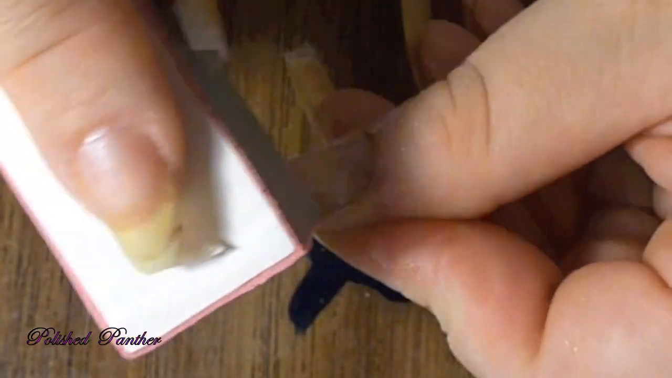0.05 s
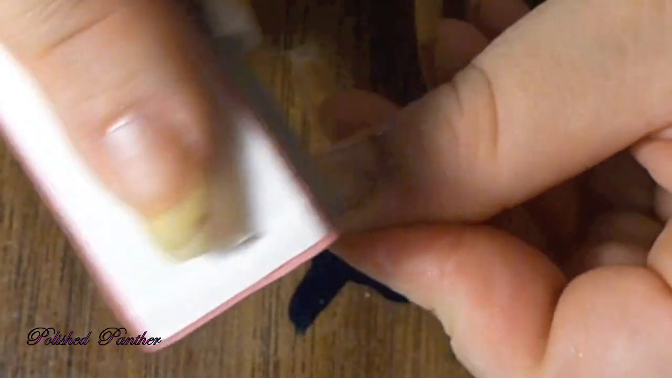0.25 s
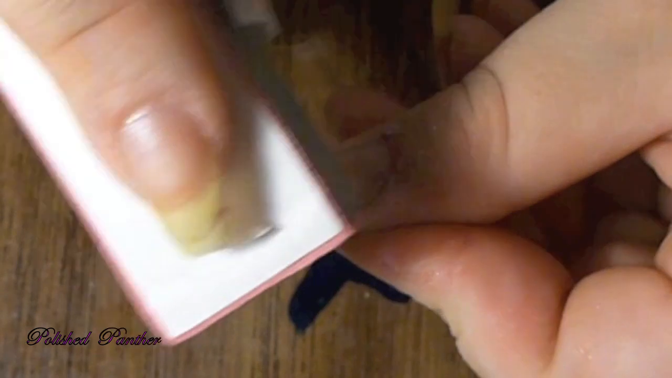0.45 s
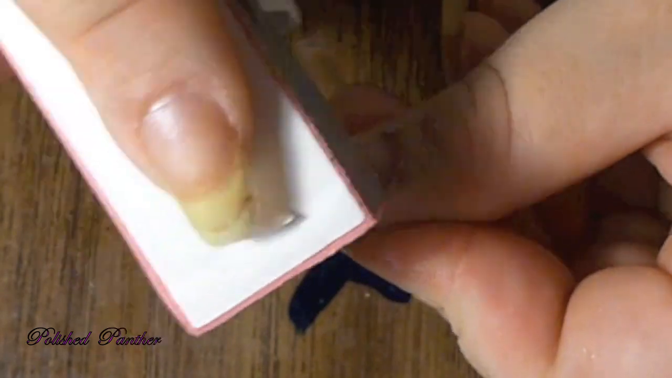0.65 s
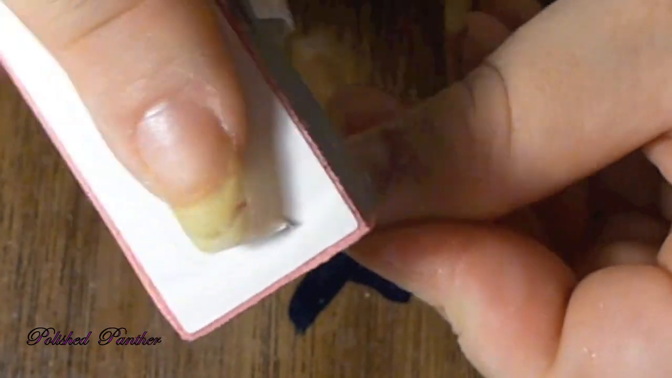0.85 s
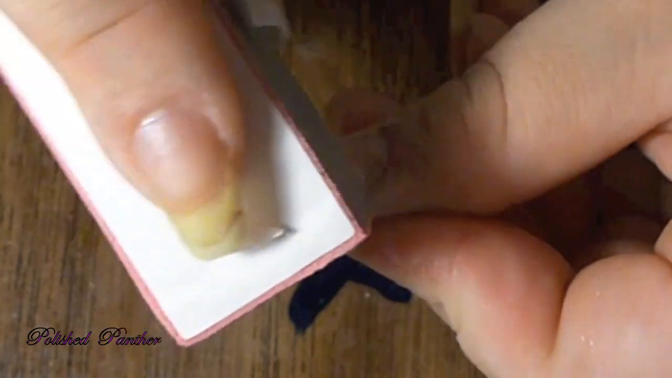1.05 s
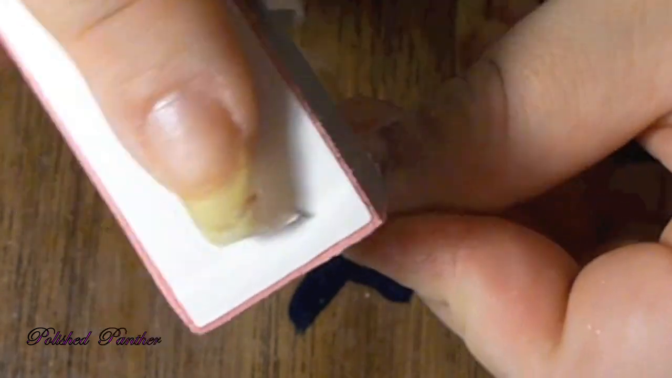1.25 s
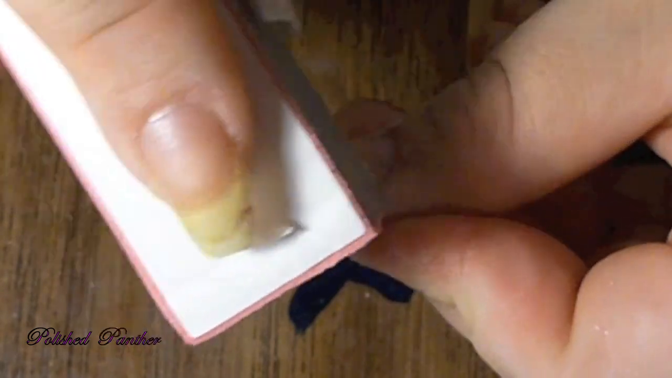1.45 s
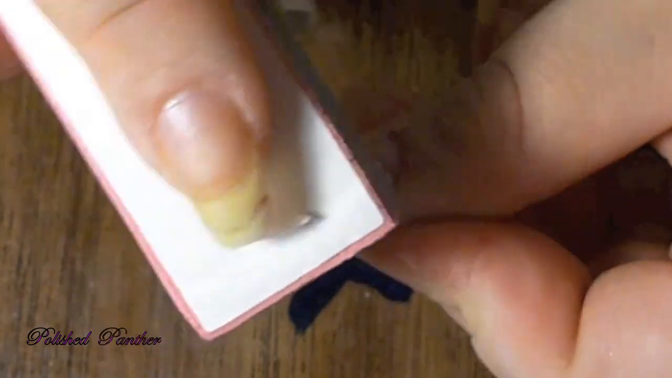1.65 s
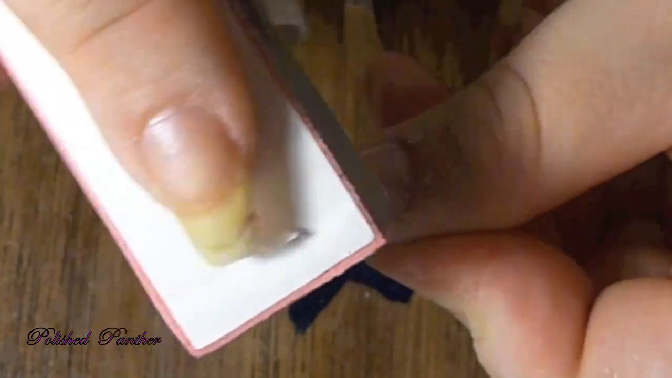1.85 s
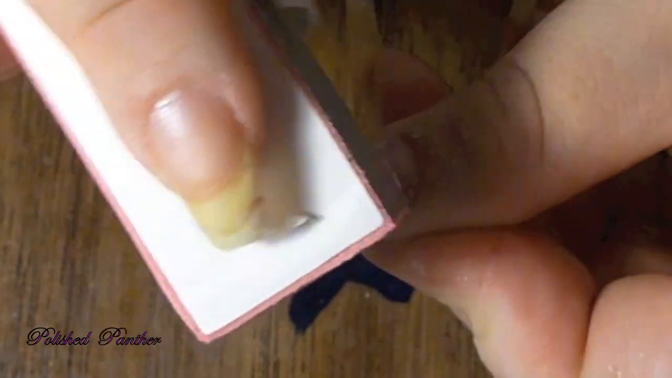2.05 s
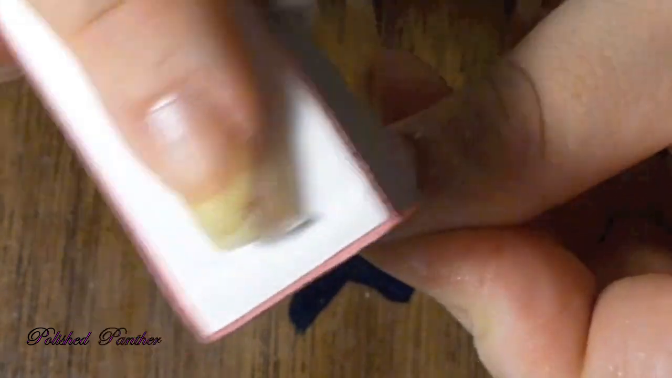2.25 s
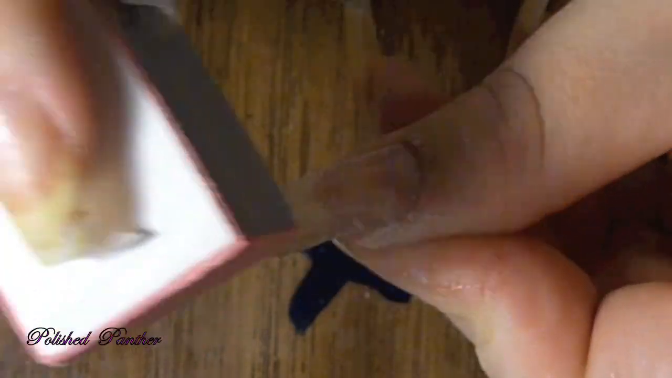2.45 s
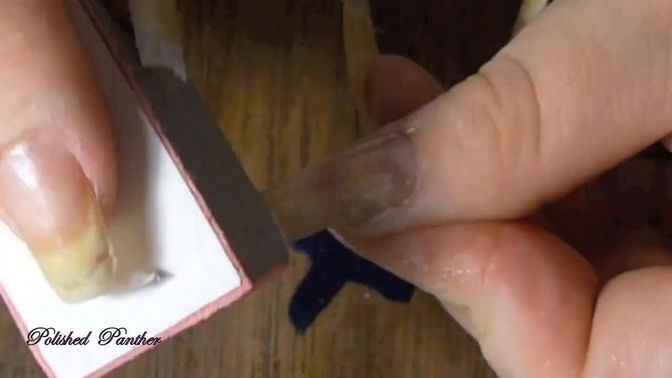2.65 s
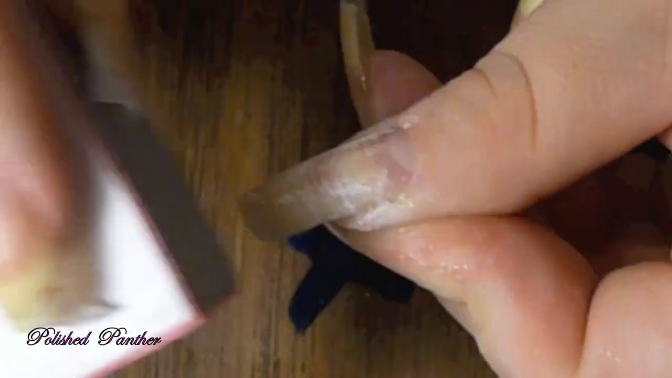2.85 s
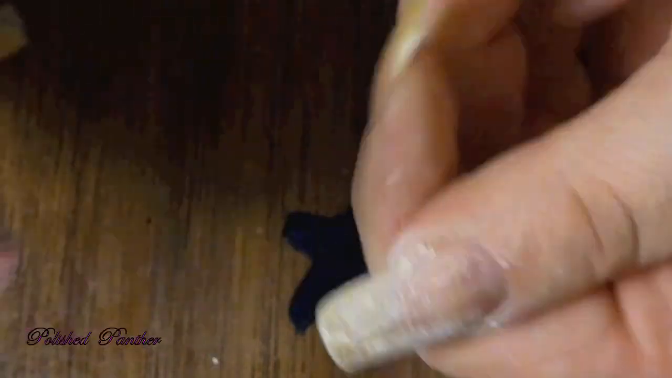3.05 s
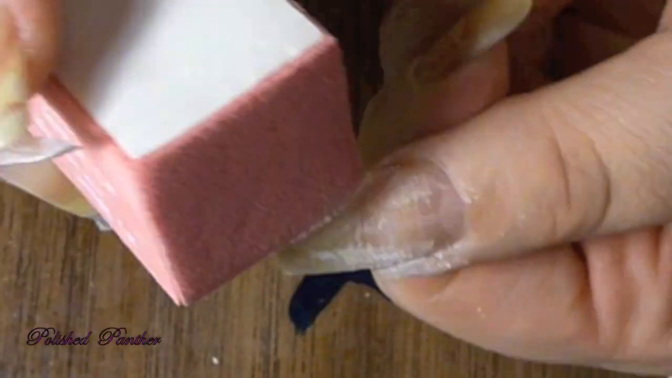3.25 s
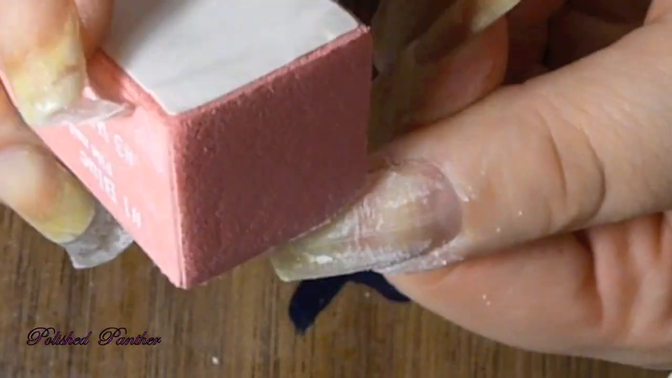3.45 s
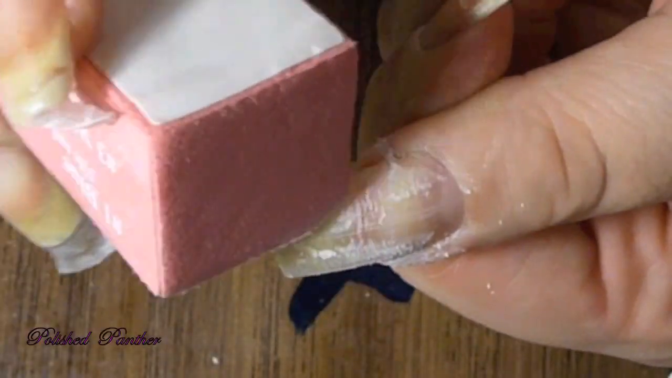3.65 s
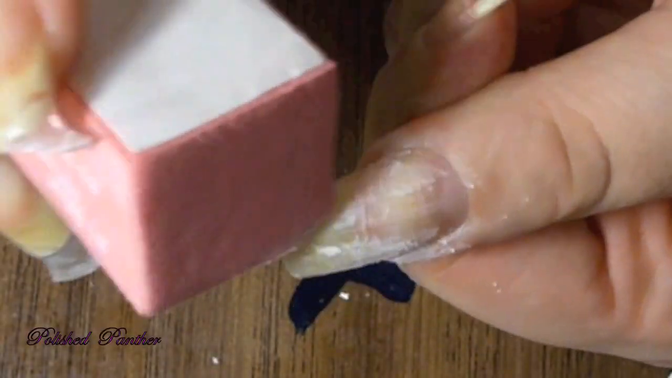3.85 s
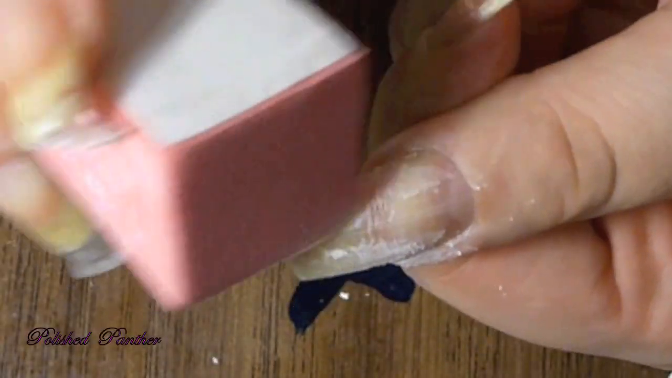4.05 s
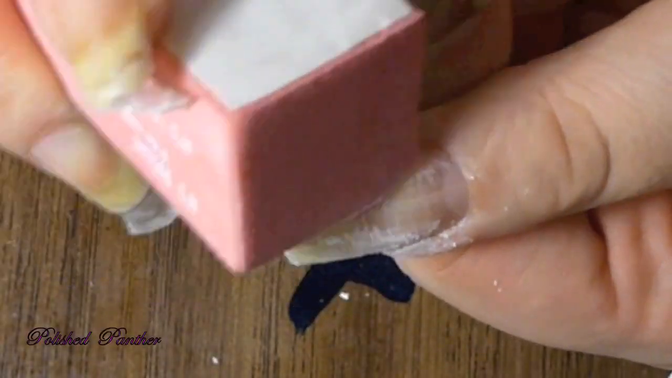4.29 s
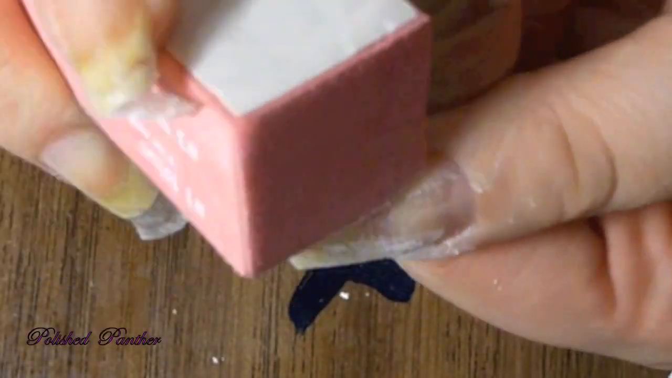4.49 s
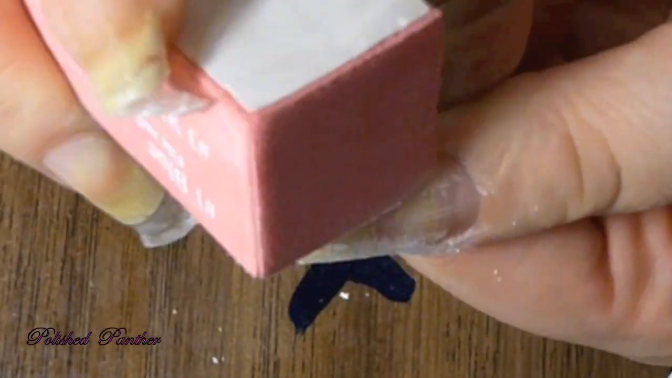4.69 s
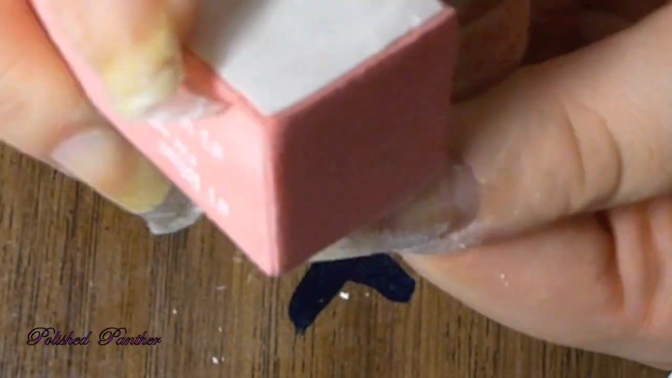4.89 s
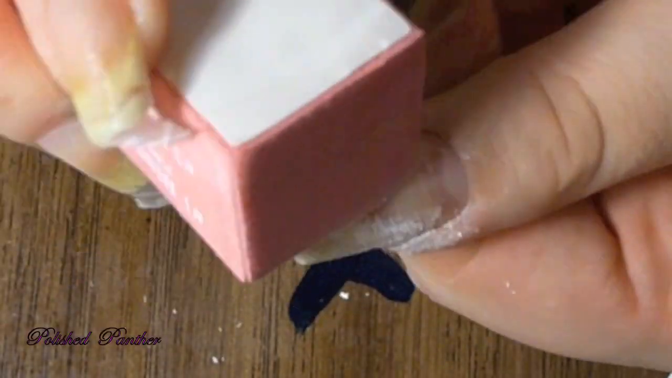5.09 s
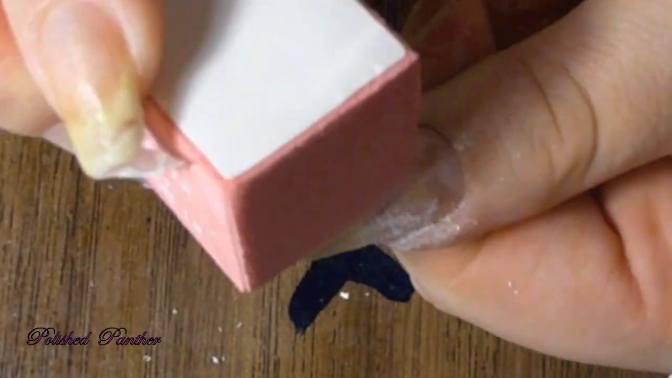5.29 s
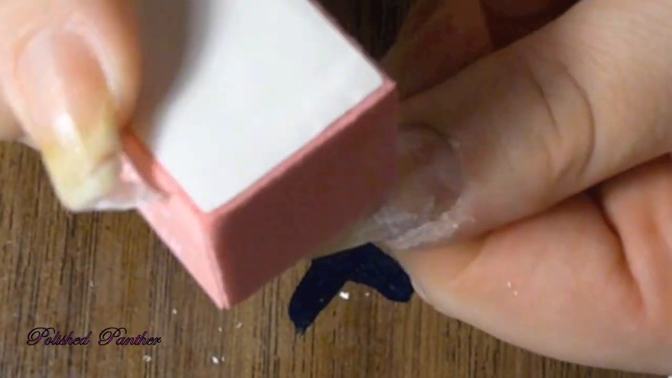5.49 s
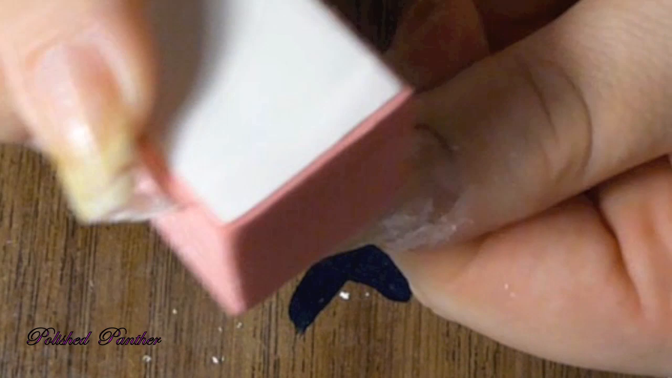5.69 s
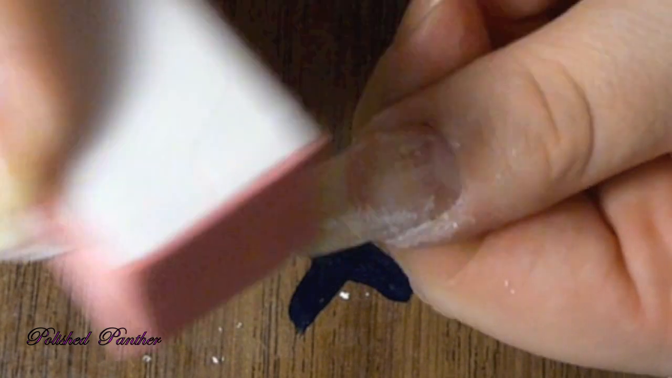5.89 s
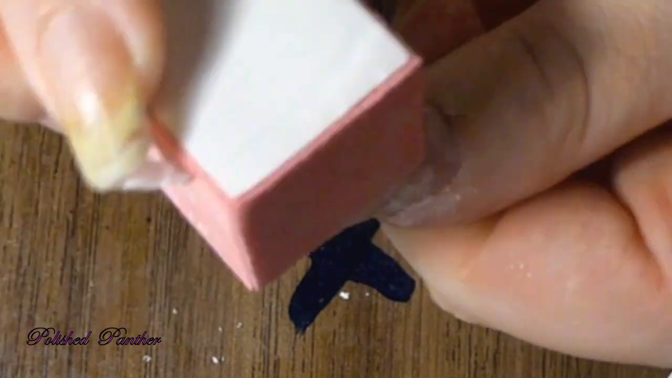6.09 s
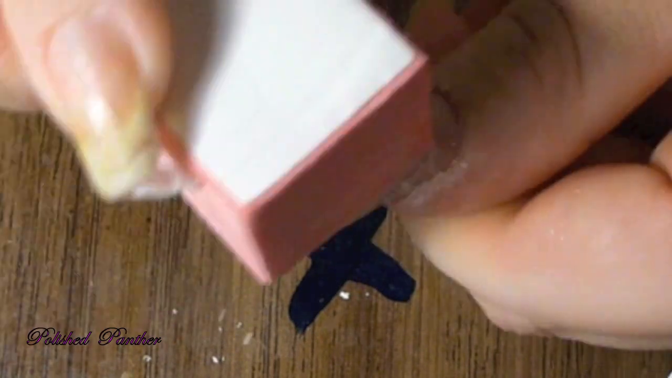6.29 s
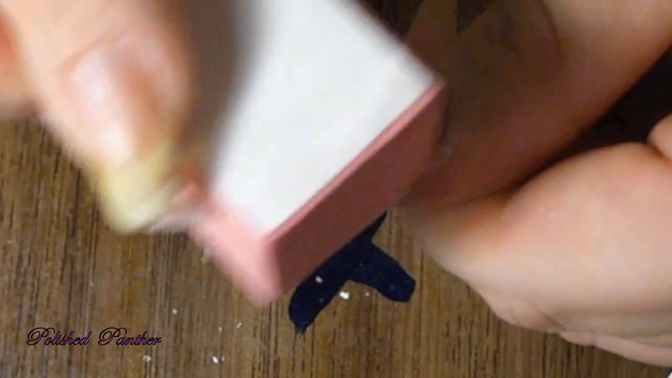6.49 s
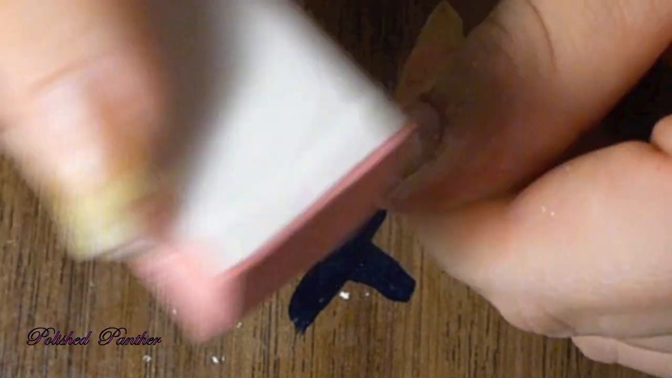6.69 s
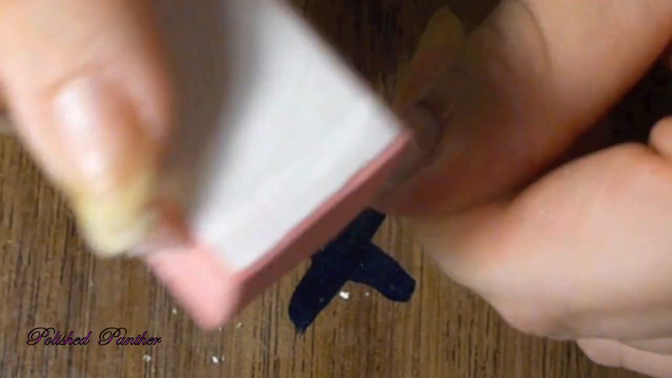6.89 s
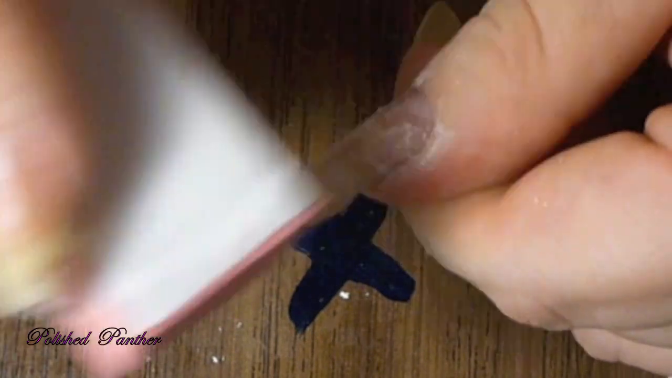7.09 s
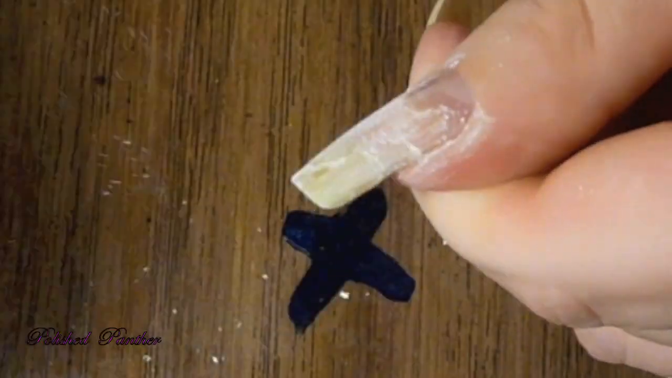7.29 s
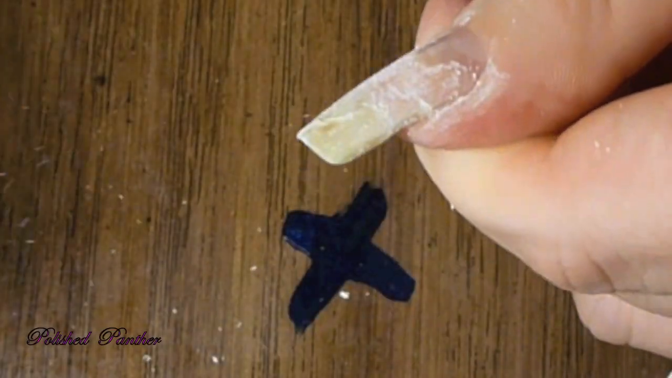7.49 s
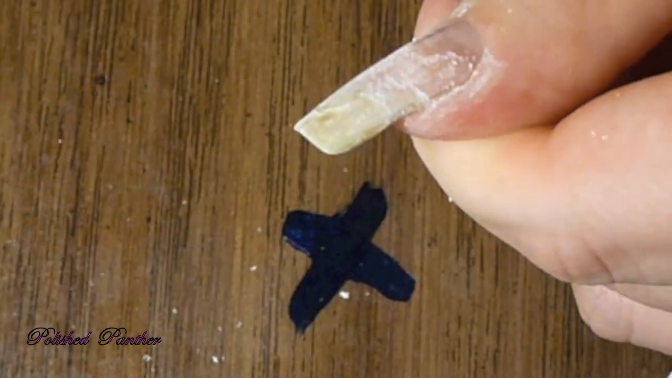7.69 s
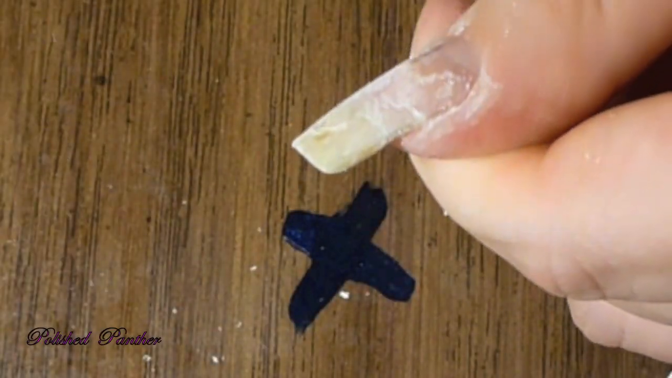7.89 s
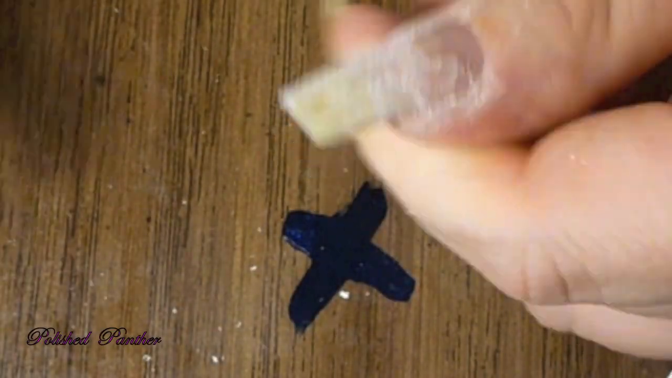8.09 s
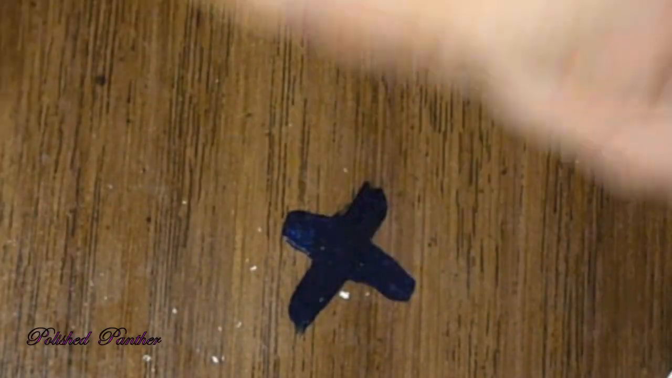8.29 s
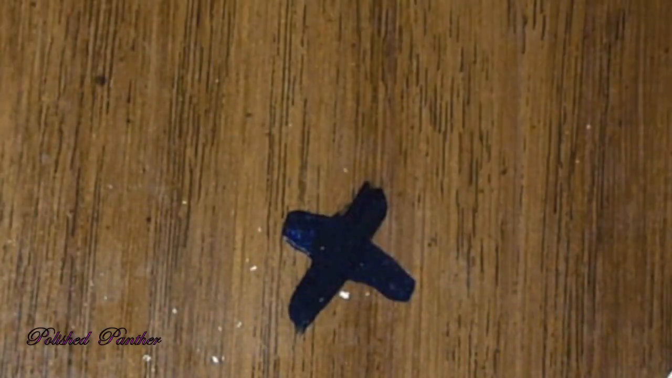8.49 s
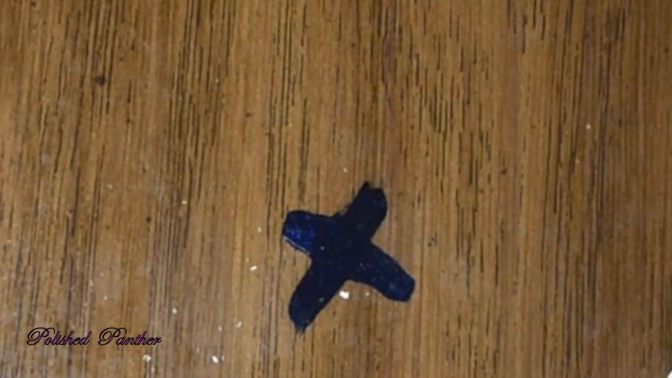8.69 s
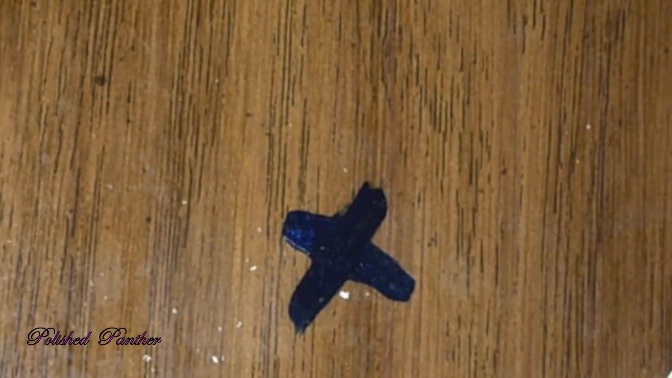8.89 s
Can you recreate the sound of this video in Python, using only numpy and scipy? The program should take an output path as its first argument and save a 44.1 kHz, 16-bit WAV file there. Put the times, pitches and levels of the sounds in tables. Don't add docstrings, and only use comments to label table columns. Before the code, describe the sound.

A foam buffer block scrapes rapidly back and forth over a fingernail, slows to tapping swipes, then drops and rattles on a wooden table.

```python
import sys
import numpy as np
from scipy import signal
from scipy.fft import rfft, irfft
from scipy.io import wavfile

SR = 44100
rng = np.random.default_rng(int(sys.argv[2]) if len(sys.argv) > 2 else 0)


def int16_out(signal):
    q = np.round(np.clip(np.atleast_2d(signal).T, -1, 1) * 32767)
    wavfile.write(sys.argv[1], SR, q.astype(np.int16))


def how_loud(loudness_db):
    steps = np.asarray(loudness_db, float) / 20
    return 10 ** steps


N = 394254

# pitch_hz, width_hz, level_db
GRIP_MODES = [
    [(700, 250, -17.5), (1261, 93, -13), (1674, 79, -12), (1886, 83, -4.5), (2190, 293, -0.5),
     (2686, 92, 4), (2913, 120, 0), (3330, 274, 2.5), (4134, 307, -6.5), (4570, 350, -6.5), (5454, 154, -5),
     (5990, 840, -17.5)],
    [(557, 230, -15.5), (747, 144, -12.5), (1048, 110, -17.5), (1410, 110, -17.5), (1523, 76, -16),
     (2110, 150, -16), (2400, 150, -14.5), (2900, 453, -8), (3344, 313, -5.5), (4120, 340, -16.5),
     (4640, 190, -17.5), (5380, 520, -22)],
    [(634, 72, -15.5), (1160, 230, -20), (1605, 420, -16.5), (2120, 250, -5.5), (2500, 220, -6),
     (2930, 395, -2), (3356, 283, 1.5), (4230, 690, 7.5), (4820, 710, 7), (5255, 700, 5),
     (6000, 510, -41.5)],
]
ROOM_T60_S = 0.56


def rms_one(x):
    return x / np.sqrt(np.mean(x ** 2) + 1e-20)


def along(rows):
    t = np.arange(N) / SR
    swells = [db + np.minimum(rise * (t - s), fall * (s - t)) for s, db, rise, fall in rows]
    return how_loud(np.max(swells, axis=0))


def drift(rate_hz):
    r = np.exp(-2 * np.pi * rate_hz / SR)
    noise = rng.standard_normal(N + SR)
    return rms_one(signal.lfilter([1], [1, -2 * r, r * r], noise)[SR:])


def resonate(x, modes):
    pulse = np.zeros(SR // 4)
    pulse[0] = 1
    out, response = 0, 0
    for k, (hz, width_hz, level_db) in enumerate(modes):
        r = np.exp(-np.pi * width_hz / SR)
        b = (-1) ** k * how_loud(level_db) * (1 - r * r) / 2 * np.array([1, 0, -1])
        a = [1, -2 * r * np.cos(2 * np.pi * hz / SR), r * r]
        out = out + signal.lfilter(b, a, x + 1e-18)
        response = response + signal.lfilter(b, a, pulse)
    return out / np.sqrt(np.sum(response ** 2))


def grit(per_s, spread_db):
    sizes = how_loud(spread_db * np.minimum(rng.exponential(1, N), 4)) * rng.choice([-1, 1], N)
    catches = rng.random(N) < per_s / SR
    return rms_one(sizes * catches)


def coloured(spectrum):
    hz = np.maximum(np.arange(N // 2 + 1) * SR / N, 1)
    points = np.array(spectrum)
    level_db = np.interp(np.log(hz), np.log(points[:, 0]), points[:, 1])
    return rms_one(irfft(rfft(rng.standard_normal(N)) * how_loud(level_db), N))


def burst(noise, length_s):
    shape = np.exp(-np.arange(len(noise)) / SR / length_s)
    return shape * noise / np.sqrt(np.sum((shape * noise) ** 2) / np.sum(shape ** 2))


def room_tone():
    # peak_s, peak_db
    rumble_peaks = [(0.94, -49.5), (2.19, -52), (2.84, -51.5), (3.66, -50), (5.38, -50.5), (6.03, -49.5),
                    (7.37, -51), (8.39, -51), (8.93, -51.5)]
    # pitch_hz, level_db (per Hz)
    rumble_colour = [(12, -47.5), (30, -20), (85, -4.5), (150, -2.5), (270, 0.5), (420, -5.5), (700, -19),
                     (2000, -52)]
    # pitch_hz, level_db (per Hz)
    hiss_colour = [(100, -17), (500, -2), (900, -2.5), (1130, -1.5), (1450, -5.5), (1900, -9.5),
                   (4730, -14.5), (7400, -29)]
    rest_db, rise_db_per_s, fall_db_per_s, air_db = -53.5, 7, 8, -52.5
    swells = along([(s, db, rise_db_per_s, fall_db_per_s) for s, db in rumble_peaks])
    rumble = np.maximum(swells, how_loud(rest_db)) * coloured(rumble_colour)
    flutter = how_loud(0.6 * drift(4))
    return rumble + how_loud(air_db) * flutter * coloured(hiss_colour)


def strokes():
    # start_s, length_s, scrape_db (at the end), swell_db (over the stroke)
    first_strokes = [(0.043, 0.054, -35.5, -3.6), (0.131, 0.052, -26, 2), (0.228, 0.048, -30, -1),
                     (0.306, 0.048, -25, 2.5), (0.406, 0.054, -35.5, -5.5), (0.497, 0.043, -24, 2.3),
                     (0.595, 0.05, -34.5, -4), (0.677, 0.05, -29.5, -1), (0.775, 0.045, -28.5, 0),
                     (0.863, 0.043, -30, 0), (0.956, 0.052, -32, -1.5), (1.041, 0.056, -31, 1.4),
                     (1.148, 0.062, -28.5, 0.9), (1.241, 0.066, -28.5, 0.1), (1.348, 0.058, -29, -0.5),
                     (1.441, 0.051, -27, 1), (1.548, 0.054, -32, -2.3), (1.629, 0.069, -27, 2.8),
                     (1.742, 0.067, -29, 2.3), (1.844, 0.058, -31, -1.5), (1.942, 0.063, -32, -1.5),
                     (2.037, 0.066, -27.5, 1.2), (2.145, 0.055, -34, -4), (2.231, 0.065, -27.5, 0.7),
                     (2.329, 0.054, -34.5, -4), (2.645, 0.064, -34, -4), (2.846, 0.063, -31, -2)]
    second_strokes = [(3.391, 0.059, -36.5, -3.5), (3.463, 0.058, -28, 2), (3.557, 0.039, -29.5, -2.5),
                      (3.652, 0.054, -26.5, -3.5), (3.73, 0.049, -22.5, 1.7), (3.832, 0.078, -28, -2.8),
                      (3.935, 0.057, -26.5, -4.5), (4.027, 0.064, -25, 0.7), (4.117, 0.053, -26.5, -0.5),
                      (4.214, 0.074, -30.5, -2.5), (4.308, 0.051, -23.5, 2), (4.403, 0.071, -31, -2.5),
                      (4.499, 0.057, -26.5, -1), (4.595, 0.06, -27.5, -1), (4.681, 0.049, -25, 2),
                      (4.783, 0.07, -25.5, 1.8), (4.878, 0.061, -32, -3), (4.975, 0.078, -28.5, -1),
                      (5.074, 0.072, -28.5, -0.8), (5.173, 0.081, -32, -5.5), (5.269, 0.072, -23.5, 1.8),
                      (5.37, 0.064, -26, 0.5), (5.472, 0.059, -28, -1.5), (5.569, 0.059, -33.5, -3),
                      (5.659, 0.061, -25.5, 1), (5.759, 0.051, -34, -4.5), (5.831, 0.058, -25.5, 1.5),
                      (5.919, 0.057, -32, -3.5)]
    one_way = [
        (6.171, 0.055, -25.5, -1),
        (6.366, 0.064, -28, -1),
        (6.556, 0.052, -30.5, -2.5),
        (6.73, 0.06, -30.5, -2),
        (6.928, 0.067, -34.5, -3),
        (7.026, 0.044, -27, 11),
        (7.107, 0.065, -31.5, -1.5),
    ]
    # body_db, more body_db on the way back, body change (dB/s),
    # nail hiss_db, hiss change (dB/s)
    grip_shares = [
        (-12.5, 2, -0.52, -5.5, 0.92),
        (-16.5, -0.3, -0.25, -12.5, 1.65),
        (-17, -1.4, 2.5, 0, -5.1),
    ]
    usual_scrape_db = -28.5
    hold = 0.33
    rows = []
    for grip, (moves, shares) in enumerate(zip([first_strokes, second_strokes, one_way], grip_shares)):
        body_db, back_db, body_slope, hiss_db, hiss_slope = shares
        for k, (s, length_s, level_db, swell_db) in enumerate(moves):
            since_s = s - moves[0][0]
            held_db = hold * (level_db - swell_db - usual_scrape_db)
            body = body_db + back_db * (k % 2) + body_slope * since_s - held_db
            hiss = hiss_db + hiss_slope * since_s - held_db
            rows.append((grip, s, length_s, level_db, swell_db, body, hiss))
    return rows


def rubbing():
    # middle_s, growth (dB/s)
    flattening = [
        (1.2, 0.34),
        (4.5, 2.5),
        (6.6, 2.5),
    ]
    rise_s, fall_s, wobble_db = 0.012, 0.031, 0.5
    body_top_hz, low_scrape_top_hz, hiss_from_hz = 1800, 2600, 3900
    rows = strokes()
    pressure = np.zeros((len(GRIP_MODES), 3, N))
    stroke = np.zeros(N, int)
    for number, (grip, s, length_s, level_db, swell_db, body_db, hiss_db) in enumerate(rows):
        t = np.arange(-rise_s / 2, length_s + fall_s, 1 / SR)
        bite = np.clip(t / rise_s + 0.5, 0, 1)
        release = np.clip((length_s - t) / fall_s + 0.5, 0, 1)
        swell = how_loud(level_db + 2.14 * swell_db * (t / length_s - 1.0))
        shape = bite ** 1.17 * np.sin(np.pi / 2 * release) ** 2 * swell
        late_db = 3 * (t / length_s - 0.5)
        start = round((s - rise_s / 2) * SR)
        pressure[grip, :, start:start + len(t)] += shape * how_loud([body_db + late_db, 0 * t, hiss_db + 0 * t])
        stroke[start:] = number
    time_s = np.arange(N) / SR
    pressure[0] += how_loud(-47 - 60 * time_s / ROOM_T60_S)
    grains = grit(per_s=9000, spread_db=2.0) * how_loud(wobble_db * drift(51))
    wander = how_loud(0.9 * rng.standard_normal((len(rows), 13)))
    out = np.zeros(N)
    for modes, shares, (middle_s, growth) in zip(GRIP_MODES, pressure, flattening):
        grown = how_loud(np.clip(growth * (time_s - middle_s), -6, 6))
        modes = np.array(modes)
        group = np.searchsorted([body_top_hz, hiss_from_hz], modes[:, 0])
        power = modes[:, 1] * how_loud(2 * modes[:, 2])
        for k, mode in enumerate(modes):
            weight = (-1) ** k * np.sqrt(power[k] / power[group == group[k]].sum())
            load = grown if body_top_hz < mode[0] < low_scrape_top_hz else 1
            push = grains * load * shares[group[k]] * wander[stroke, k]
            out += weight * resonate(push, [mode])
    return out


def taps():
    # start_s, peak_db, knock_db (relative to the peak), contact_s
    landings = [(2.604, -27, -14.5, 0.0036), (2.816, -24, -13, 0.0017), (2.909, -22, -16, 0.0017),
                (3.357, -35, -34, 0.0011), (3.658, -16.5, -16, 0.00069), (6.151, -19.5, -8.5, 0.00081),
                (6.222, -40, -18, 0.002), (6.344, -24.5, -4, 0.0013), (6.355, -27, -13, 0.00076),
                (6.429, -51.5, -41, 0.0021), (6.532, -16, -18, 0.00061), (6.696, -28, -10.5, 0.0068),
                (6.791, -21, -15, 0.0029), (6.903, -28, -11.5, 0.0012), (7.159, -10.5, -18.5, 0.0014),
                (7.235, -43, -32, 0.0017), (7.297, -64, -21, 0.0012)]
    knock_modes = [(604, 150, 6.5), (1110, 340, 2.0), (1870, 280, -0.5)]   # pitch_hz, width_hz, level_db
    bright, dull = np.zeros((2, N))
    crack = rng.standard_normal((len(landings), 1500))
    for (s, peak_db, knock_db, contact_s), noise in zip(landings, crack):
        at = round(s * SR)
        bright[at:at + len(noise)] += how_loud(peak_db - 2.5) * burst(noise, contact_s)
        dull[at] += how_loud(peak_db + knock_db + 19.5)
    return resonate(bright, GRIP_MODES[0][4:]) + resonate(dull, knock_modes)


def brushing():
    # peak_s, peak_db, rise (dB/s), fall (dB/s)
    brushes = [(2.95, -48.5, 300, 20), (3.078, -42.5, 496, 165), (3.36, -42, 1500, 298),
               (3.4, -49.5, 604, 502), (7.248, -47, 188, 375), (7.298, -34, 1600, 778),
               (7.316, -48, 1571, 67), (8.282, -45.5, 145, 56), (8.45, -52, 45, 110), (8.62, -52, 76, 148),
               (8.874, -47.5, 1602, 124)]
    rustle_modes = [(2000, 1860, -5.5), (3100, 2560, -1.5), (4520, 2600, -5.5)]   # pitch_hz, width_hz, level_db
    rustle = resonate(grit(per_s=1200, spread_db=-5.0), rustle_modes)
    return along(brushes) * rustle * how_loud(-3.5)


def rubs():
    # start_s, length_s, pitch_hz, width_hz, level_db
    skin_rubs = [
        (2.96, 0.043, 2900, 700, -45),
        (6.2, 0.26, 213, 200, -54.5),
        (7.537, 0.13, 1120, 200, -53.5),
        (7.86, 0.13, 1150, 179.7, -58),
        (8.039, 0.0058, 2950, 500, -29),
        (8.333, 0.017, 820, 204.4, -42.5),
        (8.4, 0.11, 1945, 605, -48),
        (8.6, 0.036, 3400, 2500, -62),
        (8.784, 0.038, 300, 288, -40.5),
    ]
    out, noise = np.zeros(N), rng.standard_normal(N)
    for s, length_s, hz, width_hz, level_db in skin_rubs:
        at = round(s * SR)
        swell = np.hanning(round(length_s * SR))
        mode = [(hz, width_hz, 0)]
        tone = resonate(resonate(noise[at:at + len(swell)], mode), mode)
        out[at:at + len(swell)] += how_loud(level_db) * swell * rms_one(tone)
    return out


def dropped_block():
    # start_s, click_db, click_hz, thud_db, thud_brightness_hz
    bounces = [(8.035, -22, 2900, -28, 500), (8.0724, -22, 3700, -22, 3500), (8.093, -29, 4740, -30.5, 700),
               (8.137, -26.5, 2950, -27, 700), (8.144, -22, 3700, -37, 2500),
               (8.16, -43, 2300, -30.5, 2200), (8.186, -20.5, 3530, -34, 1000),
               (8.218, -33, 2600, -34.5, 1000), (8.264, -38, 3740, -49, 1000),
               (8.285, -37.5, 2750, -44, 700), (8.358, -38, 5000, -47, 1000), (8.557, -44, 4100, -55, 1000)]
    # peak_s, peak_db, rise (dB/s), fall (dB/s)
    rocks = [
        (8.043, -24.5, 4000, 401),
        (8.074, -21.5, 2994, 127),
        (8.164, -22.5, 175, 171),
        (8.28, -45, 900, 90),
    ]
    # pitch_hz, width_hz, level_db
    table_modes = [(145, 13, -2.5), (200, 18, -4.5), (334, 194, -5.5), (442, 43, -0.5), (595, 46, 1),
                   (930, 230, -6), (1097, 46, 2), (1380, 170, -1), (1880, 720, -2.5), (1985, 69, 1),
                   (2300, 100, -10.5)]
    out, blows = np.zeros((2, N))
    click_band = signal.butter(2, [1800, 6800], "band", fs=SR, output="sos")
    crack = rng.standard_normal((len(bounces), 1200))
    for (s, click_db, click_hz, thud_db, bright_hz), tick in zip(bounces, crack):
        at = round(s * SR)
        snap = np.abs(burst(tick, 0.0001)) * 4 + 0.5 * burst(tick, 0.0036)
        click = resonate(snap, [(click_hz, 600, 0), (1.1 * click_hz, 700, -3), (1.19 * click_hz, 1500, -6)])
        out[at:at + len(click)] += how_loud(click_db - 0.5) * signal.sosfilt(click_band, click)
        push = np.hanning(round(SR / bright_hz) + 2)
        push = push / np.sqrt(np.sum(push ** 2))
        for lag_s, skip_db in [(0, 0), (0.0022, -9.5), (0.0062, -4.5)]:
            hit = at + round(lag_s * SR)
            blows[hit:hit + len(push)] += how_loud(thud_db + skip_db + 22) * push
    grains = grit(per_s=800, spread_db=3.0) * along(rocks)
    rocking = how_loud(2.5) * signal.lfilter(*signal.butter(2, 1000, fs=SR), grains)
    scuffing = how_loud(-16.5) * resonate(grains, [(2380, 840, 0.5), (4200, 2200, -12)])
    ringing = resonate(blows + rocking, table_modes)
    no_lows = signal.butter(4, 110, "high", fs=SR, output="sos")
    return out + scuffing + signal.sosfilt(no_lows, ringing)


def room(x):
    t = np.arange(round(0.6 * SR)) / SR
    noise = rng.standard_normal(len(t))
    dull = signal.lfilter(*signal.butter(2, 4000, fs=SR), noise)
    tail = dull + (noise - dull) * how_loud(-40 * t / ROOM_T60_S)
    tail = tail * how_loud(-60 * t / ROOM_T60_S) * np.clip(t / 0.011, 0, 1)
    return how_loud(-15.5) * signal.fftconvolve(x, tail / np.sqrt(np.sum(tail ** 2)))[:N]


def scene():
    near = rubbing() + taps() + brushing() + rubs() + dropped_block()
    return np.tile(near + room(near) + room_tone(), (2, 1))


def roll_off(x):
    return signal.sosfilt(signal.butter(12, 7530, fs=SR, output="sos"), x)


def record(dry):
    peak = 0.45
    rounded = peak * np.tanh(dry / peak)
    cut = signal.sosfilt(signal.butter(12, 6810, fs=SR, output="sos"), rounded)
    cut = signal.sosfilt(signal.cheby2(8, 30, 7800, fs=SR, output="sos"), cut)
    return roll_off(cut)


dry = scene()
out = record(dry)
int16_out(out)
```